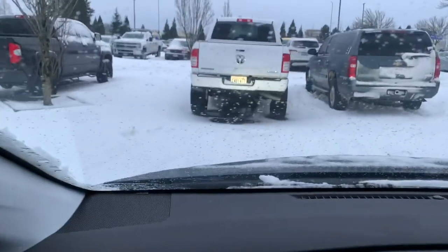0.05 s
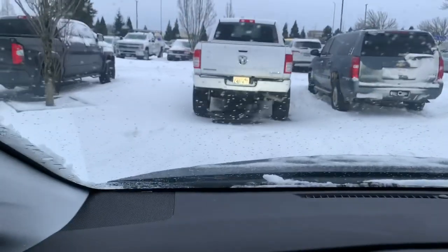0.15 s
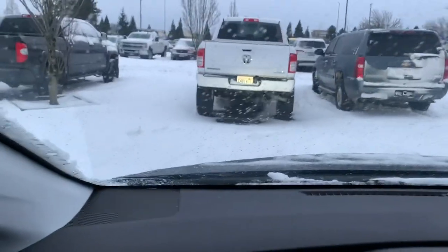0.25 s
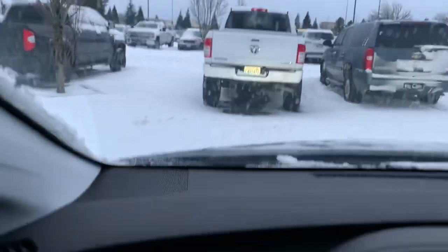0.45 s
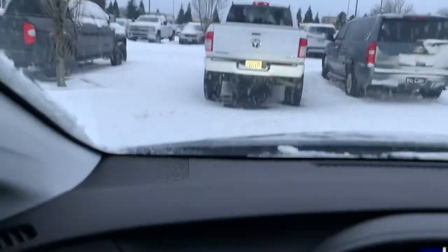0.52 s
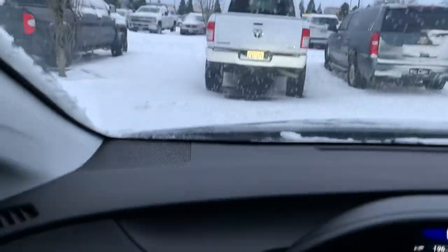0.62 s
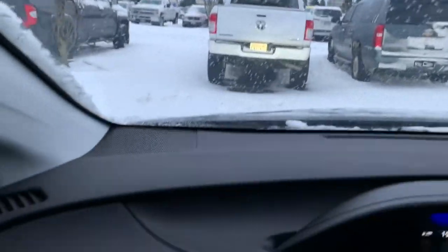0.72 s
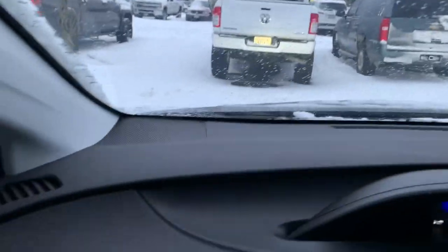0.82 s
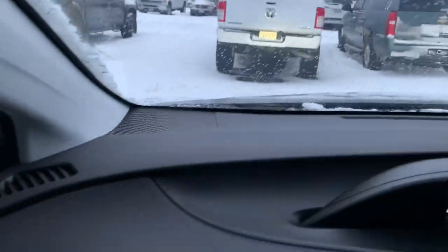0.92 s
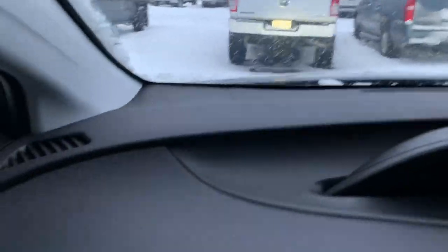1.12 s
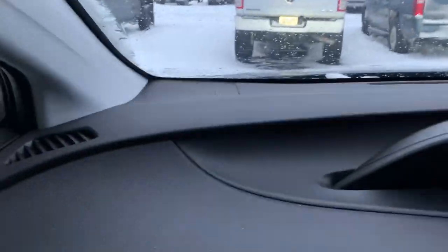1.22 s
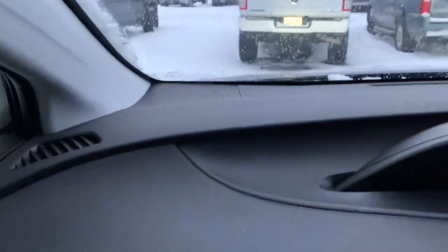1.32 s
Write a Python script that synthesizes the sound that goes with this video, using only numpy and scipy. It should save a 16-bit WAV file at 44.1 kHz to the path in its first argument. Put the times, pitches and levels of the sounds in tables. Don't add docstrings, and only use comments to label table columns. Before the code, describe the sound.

Car rolling slowly on snow: deep shuddering rumble in the cabin, with faint ticks and cloth rustle

```python
import sys
import numpy as np
from scipy import signal
from scipy.fft import rfft, irfft
from scipy.io import wavfile
from scipy.ndimage import uniform_filter1d

SR = 44100
rng = np.random.default_rng(int(sys.argv[2]) if len(sys.argv) > 2 else 0)


def to_wav(sig):
    pcm = np.clip(np.atleast_2d(sig), -1, 1) * 32767
    pcm = np.round(pcm).astype(np.int16)
    wavfile.write(sys.argv[1], SR, pcm.T)


def gain_from_db(level_db):
    decades = np.asarray(level_db, float) / 20
    return 10 ** decades


N = 59535


def set_level(x, db):
    return x * gain_from_db(db) / np.sqrt(np.mean(x ** 2))


def curve(table, column):
    table = np.array(table)
    return np.interp(np.arange(N) / SR, table[:, 0], table[:, column])


def walk(rate):
    hold = int(SR / rate)
    steps = np.repeat(rng.standard_normal(N)[:N // hold + 1], hold)
    smooth = uniform_filter1d(uniform_filter1d(steps, hold), hold)
    return 1.04 * smooth[:N]


def colour(x, points):
    hz, db = np.array(points).T
    hz = np.r_[hz[0] / 2, hz, hz[-1] * 2]
    db = np.r_[db[0] - 24, db, db[-1] - 24]
    f = np.fft.rfftfreq(N, 1 / SR)
    gain_db = np.interp(np.log(f + 1), np.log(hz), db)
    return irfft(rfft(x) * gain_from_db(gain_db), N)


def restless(x, swell_db, flicker_db, rate):
    spectrum = rfft(x)
    octave = np.log2(np.fft.rfftfreq(N, 1 / SR) + 1)
    swell, out = walk(6.46), 0
    for mid in np.arange(4, 14.6, .5):
        share = np.clip(1 - 2 * np.abs(octave - mid), 0, 1)
        gain_db = swell_db * swell + flicker_db * walk(rate)
        out = out + irfft(spectrum * share, N) * gain_from_db(gain_db)
    return out


def bursts(events):
    t, f = np.arange(N) / SR, np.fft.fftfreq(N, 1 / SR)
    noise = np.fft.fft(rng.standard_normal(N))
    rise = 0.26
    out = 0
    for at, db, hz, width, length in events:
        band = np.fft.ifft(noise * np.exp(-((f - hz) / width) ** 2 * 2))
        ring = (band / np.abs(band)).real
        age = np.clip(t - at, 0, 1) / length
        out = out + 3 * gain_from_db(db) * ring * (1 - np.exp(-age / rise)) * np.exp(-age)
    return out


def shudder():
    # (time [s], slip rate [Hz], shudder level [dB], level of the third partial [dB])
    slips = [(.1, 51.03, -48, -81), (.17, 54.6, -59.5, -58), (.24, 57.1, -30, -52), (.305, 57.28, -46, -61),
             (.34, 57.53, -34, -47), (.47, 57.14, -43.5, -53.5), (.515, 53.26, -35.5, -57.5),
             (.64, 49.56, -55.5, -49.5), (.705, 50.68, -30, -41.5), (.775, 50.42, -32.5, -46.5),
             (.83, 42.95, -21.5, -37), (.875, 41.62, -45, -40.5), (.935, 42.68, -41.5, -71),
             (.992, 45.3, -27.5, -47), (1.045, 47.2, -37.5, -56), (1.095, 48.77, -54, -47),
             (1.3, 48.5, -39, -79), (1.35, 47.2, -63, -47)]
    jitter, flicker_db = 0.041, 3.5
    second_db, fourth_db = 3.5, -3.5
    sharpen, loud_db = 0.75, -18.5
    slip_hz = curve(slips, 1) * (1 + jitter * walk(24.5))
    phase = 2 * np.pi * np.cumsum(slip_hz) / SR
    shake_db = curve(slips, 2) + flicker_db * walk(31.54)
    bite_db = curve(slips, 3) + flicker_db * walk(30.26)
    even = gain_from_db(second_db) * np.cos(2 * phase) + gain_from_db(fourth_db) * np.cos(4 * phase)
    even = even * gain_from_db(sharpen * (shake_db - loud_db))
    upper = gain_from_db(bite_db) * (even + np.cos(3 * phase))
    return np.sqrt(2) * (gain_from_db(shake_db) * np.cos(phase) + upper)


def booms():
    # (time [s], peak level [dB],
    # pitch [Hz], spread of pitch [Hz], length [s])
    lumps = [(.015, -45, 95, 3, .03), (.105, -46, 60, 3, .025), (.152, -47, 140, 4, .025),
             (.214, -36.5, 150, 4, .034), (.222, -42.5, 115, 4, .035), (.265, -46, 88, 3, .025),
             (.322, -45, 165, 4, .03), (.385, -46, 176, 4, .03), (.47, -51, 95, 3, .03),
             (.52, -50, 175, 4, .025), (.552, -46, 100, 3, .025), (.79, -39, 92, 4, .03),
             (.872, -40, 80, 3, .022), (.922, -42, 80, 3, .025), (.93, -47, 120, 4, .03),
             (.995, -45, 85, 3, .025), (1.08, -44, 115, 4, .025), (1.12, -44, 68, 3, .025),
             (1.148, -45, 95, 3, .03), (1.225, -47, 65, 3, .025), (1.272, -47, 105, 3, .025)]
    return bursts(lumps)


def ticks():
    # (time [s], peak level [dB], pitch [Hz], spread of pitch [Hz], length [s])
    snaps = [(.006, -63, 9050, 10000, .005), (.003, -65, 5900, 300, .003), (.008, -66, 9700, 400, .006),
             (.082, -59, 1280, 150, .003), (.163, -63, 7000, 1200, .004), (.164, -66, 10800, 2000, .005),
             (.163, -67, 15300, 800, .008), (.163, -67, 4500, 3000, .004), (.2, -48, 540, 30, .006),
             (.303, -73, 9000, 2600, .004), (.661, -65, 2900, 2000, .006), (.753, -56, 3900, 30, .0045),
             (.78, -59, 3760, 40, .004), (.778, -61, 4450, 60, .003), (.788, -63, 4300, 300, .005),
             (.798, -63, 4350, 300, .004), (.788, -62, 6740, 700, .012), (.846, -63, 9850, 500, .008),
             (.844, -62, 4300, 1600, .008), (.877, -67, 6450, 150, .005), (.888, -72, 6450, 300, .02),
             (.885, -70, 4250, 600, .008), (.864, -60, 1360, 12, .025), (.856, -61, 1250, 15, .015),
             (.893, -62, 1240, 15, .012), (.949, -54, 500, 20, .007), (.862, -61, 860, 30, .02),
             (.96, -65, 1240, 20, .05), (1.0345, -46.5, 490, 20, .003), (1.0345, -52, 810, 20, .004),
             (1.0345, -58, 1050, 30, .003), (1.319, -51, 375, 8, .009), (1.0345, -64, 2500, 3200, .0025),
             (1.096, -76.5, 4974, 5700, .027)]
    return bursts(snaps)


def fibre_clicks():
    per_second, scatter_db = 810, 5.5
    chance = rng.random((2, N))
    strength = gain_from_db(-scatter_db * np.log(1 - chance[1]))
    clicks = (chance[0] < per_second / SR) * strength
    return signal.lfilter([1], [1, -.9], clicks)


def sleeve(fibres, rub):
    # (time [s], level [dB])
    rubbing = [(0.0, -59), (0.022, -70), (0.056, -78.5), (0.172, -63.5), (0.232, -66.5), (0.552, -68),
               (0.646, -65), (0.672, -59.5), (0.684, -63.5), (0.788, -58), (1.03, -66), (1.07, -77.5),
               (1.322, -99), (1.35, -65)]
    # (pitch [Hz], level in each Hz [dB])
    cloth = [(500, 2), (1300, 9), (2500, -0.5), (4000, -1.5), (6700, -6), (9000, -4), (12000, -18.5),
             (16000, -11.5)]
    clicks = set_level(fibres * np.sign(rng.standard_normal(N)), -17.5)
    rustle = colour(rng.standard_normal(N) + clicks, cloth)
    flicker_db = 2 * rub
    return set_level(rustle, 0) * gain_from_db(curve(rubbing, 1) + flicker_db)


def cabin():
    # (pitch [Hz], level in each Hz [dB])
    rumble = [(25, -15), (55, -4), (100, -8.5), (220, -18), (520, -27), (700, -35), (1650, -47.5),
              (1900, -64)]
    # (pitch [Hz], width [Hz], lift [dB])
    cabin_rings = [(341.7, 52, 4.5), (538.4, 21, 5), (994, 60, 7.5), (1233, 100, 6), (1599, 37, 13.5)]
    # (pitch [Hz], level in each Hz [dB])
    hiss_tone = [(1500, 11), (4000, -1), (8000, -1), (11000, 1), (16000, 0)]
    f = np.fft.rfftfreq(N, 1 / SR)
    lift_db = sum(db / (1 + (2 * (f - hz) / width) ** 2) for hz, width, db in cabin_rings)
    road = colour(rng.standard_normal(N), rumble)
    road = irfft(rfft(road) * gain_from_db(lift_db), N)
    road = restless(road, swell_db=-1.3, flicker_db=0.52, rate=31.0)
    hiss = colour(rng.standard_normal(N), hiss_tone)
    return set_level(road, -44) + set_level(hiss, -76.5)


def ports(x, other):
    # (pitch [Hz], likeness [0-1], lead of the left [radians], left minus right [dB])
    openings = [(40, .99, -.08, -.4), (150, .96, -.15, 2.5), (350, .7, -.3, 2), (1200, .4, -1, 2),
                (3500, .2, -1.6, 0), (6500, .7, -1.2, -.5), (8600, .997, -3.14, 0), (15600, .995, -12.4, 0)]
    hz, like, lead, db = np.array(openings).T
    pad = 8192
    edge = signal.windows.tukey(N + 2 * pad, .2)
    x = np.pad(x, pad, mode="reflect") * edge
    other = np.pad(other, pad, mode="reflect") * edge
    f = np.fft.rfftfreq(len(x), 1 / SR)
    like = np.clip(np.interp(np.log(f + 1), np.log(hz), like), 0, 1)
    turn = np.exp(.5j * np.interp(f, hz, lead))
    tilt = gain_from_db(np.interp(np.log(f + 1), np.log(hz), db) / 2)
    shared = rfft(x) * np.sqrt((1 + like) / 2)
    apart = rfft(other) * np.sqrt((1 - like) / 2)
    left = irfft((shared + apart) * turn * tilt, len(x))
    right = irfft((shared - apart) / turn / tilt, len(x))
    return np.array([left, right])[:, pad:-pad]


def scene():
    fibres, rub = fibre_clicks(), walk(14.3)
    car = shudder() + booms() + ticks()
    shared = cabin() + sleeve(fibres, rub) + car
    apart = cabin() + sleeve(fibres, rub)
    return ports(shared, apart)


def band_limit(x):
    return signal.sosfilt(signal.butter(12, 16800, fs=SR, output="sos"), x)


def record(dry):
    top_hz, fade_s = 15750, .004
    treble_cut = signal.ellip(12, .2, 70, top_hz, fs=SR, output="sos")
    dry = signal.sosfilt(treble_cut, dry)
    left_over = np.clip((N - 1 - np.arange(N)) / (fade_s * SR), 0, 1)
    fade = np.sin(left_over * np.pi / 2)
    return band_limit(dry * fade)


dry = scene()
out = record(dry)
to_wav(out)
```